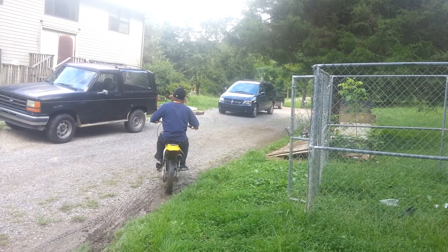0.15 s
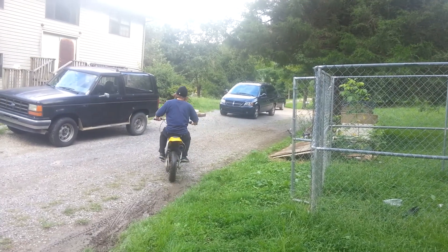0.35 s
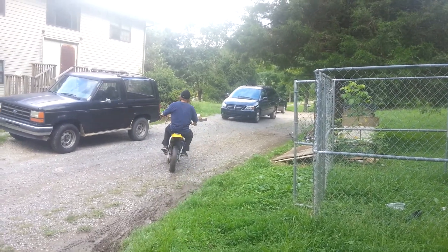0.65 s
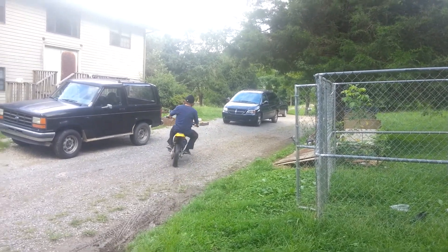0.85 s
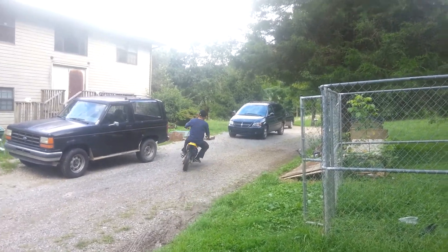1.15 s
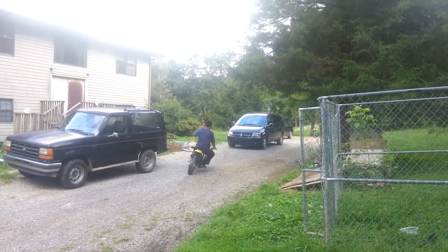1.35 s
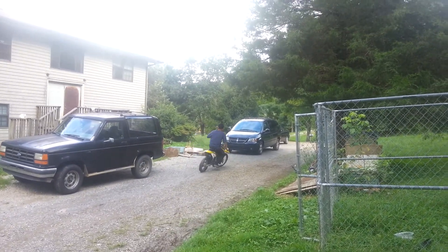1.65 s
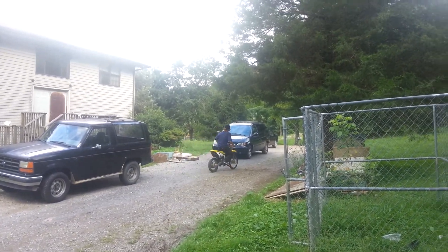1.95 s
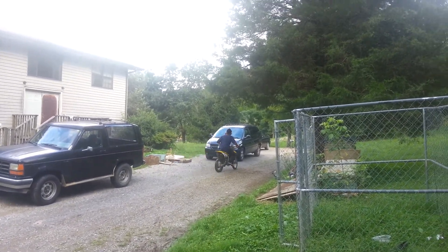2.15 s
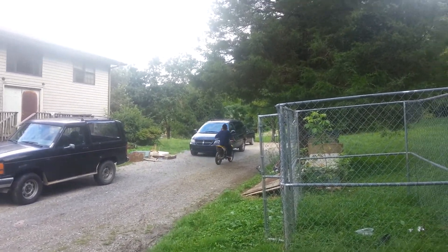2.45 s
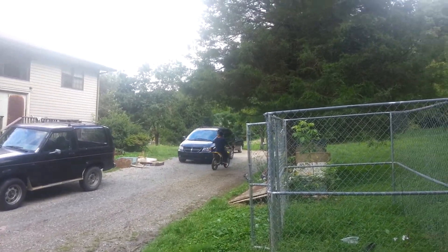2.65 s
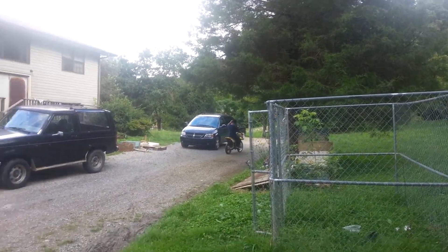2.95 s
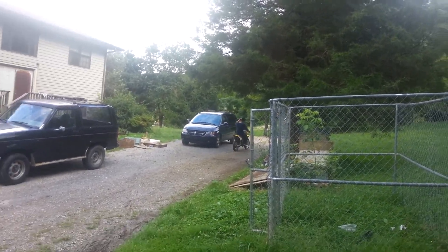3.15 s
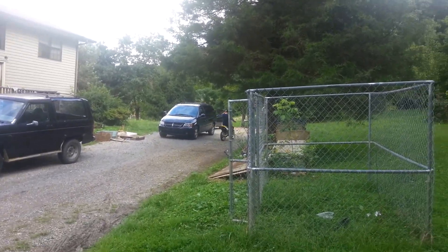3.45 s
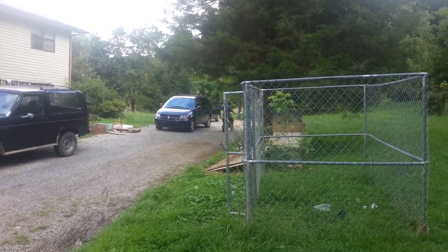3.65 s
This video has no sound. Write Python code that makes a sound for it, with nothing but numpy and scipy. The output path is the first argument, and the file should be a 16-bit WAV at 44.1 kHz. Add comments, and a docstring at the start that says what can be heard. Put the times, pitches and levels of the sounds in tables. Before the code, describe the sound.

A small dirt bike engine blares loudly up close, crackles, then putters away down a gravel drive.

```python
"""A small single-cylinder dirt bike pulls away down a gravel drive, cracks sharply and putters into the distance.
Each firing is a click shaped into bark, boom and blare, two decaying pipe tones and a puff of noise for the gas.
Short noise bursts make the cracks; valve gear and tyres are rattling, hissing noise.
House and trees echo the bike, insects shrill steadily, and the loudest peaks overload the microphone."""
import sys
import numpy as np
from scipy import signal
from scipy.fft import rfft, irfft
from scipy.io import wavfile

SR = 44100
rng = np.random.default_rng(int(sys.argv[2]) if len(sys.argv) > 2 else 0)


def wav_record(signal):
    """Record a signal, one row per channel, as 16-bit PCM in the file named by sys.argv[1]."""
    frames = np.transpose(np.atleast_2d(signal))
    bounded = np.clip(frames, -1, 1)
    # unit amplitude maps onto the largest positive 16-bit level
    quanta = np.round(bounded * 32767).astype(np.int16)
    wavfile.write(sys.argv[1], SR, quanta)


N = 167580

# How fast the engine fires: (time [s], firing rate [firings per second])
FIRING_RATE = [(0.23, 38.95), (0.29, 37.89), (0.34, 31.3), (0.45, 38.24), (0.56, 37.69), (0.66, 32.42),
               (0.76, 29.86), (1.05, 31.76), (1.3, 34.44), (1.49, 35.4), (1.55, 30.94), (1.63, 33.88),
               (1.92, 28.31), (2.2, 29.26), (2.55, 28.95), (2.75, 27.45), (3.15, 26.92), (3.35, 25.67),
               (3.8, 24.71)]


def undb(db):
    """Turn decibels into a gain."""
    return 10 ** (np.asarray(db) / 20)


def curve(table, t, axis=1):
    """Read one column of a table at time t, joining its points by straight lines."""
    rows = np.array(table)
    return np.interp(t, rows[:, 0], rows[:, axis])


def unit(x):
    """Scale a signal to an rms of 1."""
    return x / np.sqrt(np.mean(x ** 2))


def ring(x, response):
    """Let every sample of a signal set off the given response."""
    return signal.fftconvolve(x, response)[:N]


def colour(x, points, size=4096):
    """Give a signal the listed spectrum, with a filter of unit energy that never sounds early."""
    hz, db = np.array(points).T
    bin_hz = np.maximum(np.arange(size // 2 + 1) * SR / size, 1)
    gain = undb(np.interp(np.log(bin_hz), np.log(hz), db))
    # Folding the cepstrum forward in time gives the minimum-phase filter.
    cepstrum = irfft(np.log(gain))
    cepstrum[1:size // 2] *= 2
    cepstrum[size // 2 + 1:] = 0
    response = irfft(np.exp(rfft(cepstrum)))
    return ring(x, response / np.linalg.norm(response))


def pulses(times, sizes):
    """Place one single-sample click at each time."""
    return np.bincount((times * SR).astype(int), sizes, 2 * N)[:N]


def swell_and_decay(age, attack, decay):
    """Rise quickly and die away; attack and decay are in seconds."""
    return (1 - np.exp(-age / attack)) * np.exp(-age / decay)


def puffs(times, sizes, attack, decay):
    """Place one quick swell and decay at each time."""
    age = np.arange(SR // 10) / SR
    return ring(pulses(times, sizes), swell_and_decay(age, attack, decay))


def noise():
    """Make white noise of rms 1."""
    return rng.standard_normal(N)


def firings(t):
    """Time one firing for each full engine cycle, a little uneven."""
    first_s, unevenness_s = .231, .00008
    cycles = np.cumsum(curve(FIRING_RATE, t)) / SR
    cycles -= np.interp(first_s, t, cycles)
    times = np.interp(np.arange(int(cycles[-1]) + 1), cycles, t)
    return times + unevenness_s * rng.standard_normal(len(times))


def exhaust(times):
    """Each firing gives a bark, a boom, a blare, two pipe tones and a rasp of gas that rings the steel."""
    # Exhaust parts: (time [s], bark [dB], low boom [dB], lower pipe mode [dB],
    # upper pipe mode [dB], gas rasp before its lift [dB])
    exhaust_levels = [(.23, -12, -24.5, -21, -19.5, -21), (.31, -8, -22, -32, -18.5, -16),
                      (.345, -20, -15, -28, -38, -17.5), (.375, -19, -14.5, -26, -35, -15.5),
                      (.405, -22, -25, -31, -25, -31), (.45, -23, -20, -29, -16.5, -28),
                      (.485, -7.5, -22, -19, -21.5, -16.5), (.6, -10.5, -30, -20, -26.5, -18),
                      (.82, -7.5, -27, -17, -26, -15.5), (1.1, -10, -26, -20, -18.5, -22.5),
                      (1.28, -14.5, -50, -18, -12, -22.5), (1.5, -13.5, -28, -21, -21.5, -22.5),
                      (1.54, -26, -27, -35, -14.5, -30), (1.6, -22, -19, -24.5, -34, -28),
                      (1.7, -16.5, -15, -30.5, -24.5, -29), (1.82, -33.5, -27.5, -23.5, -40, -27.5),
                      (1.92, -17, -18, -29.5, -19.5, -32), (2.06, -20, -23.5, -24.5, -30.5, -33),
                      (2.2, -24, -28, -36, -27.5, -25.5), (2.35, -25, -24.5, -24.5, -30.5, -34),
                      (2.56, -30, -27, -28, -33.5, -39), (2.66, -28, -27.5, -26.5, -25, -33),
                      (2.8, -28, -33, -23.5, -27.5, -42), (2.95, -29, -40, -26.5, -31, -42.5),
                      (3.15, -45, -30, -23.5, -28, -40), (3.5, -31, -34, -30, -28.5, -46.5),
                      (3.8, -40, -34, -34.5, -34.5, -46)]
    # Upper blare of the open silencer, heard from right behind it: (time [s], level [dB])
    blare_levels = [(.23, -17.5), (.33, -11.5), (.41, -33.5), (.5, -13), (.65, -16), (.9, -20.5),
                    (1.3, -44), (1.9, -34), (2.5, -52), (3.8, -49)]
    # Relative spectra of the parts: (frequency [Hz], level [dB per Hz])
    bark_spectrum = [(30, -31), (60, -40), (95, -23.5), (145, -2.5), (245, 1), (360, -1), (435, -19),
                     (600, -14), (730, -11), (950, -30.5), (1400, -30), (3000, -44), (9000, -68.5)]
    boom_spectrum = [(40, -21.5), (60, -20.5), (82, -0.5), (105, -9), (132, 5), (180, -2), (300, -17.5),
                     (900, -52.5)]
    blare_spectrum = [(200, -27.5), (480, -22), (620, -19), (715, 4.5), (810, -1), (930, -17.5),
                      (1200, -18), (2500, -24), (8000, -44.5)]
    rasp_spectrum = [(300, 0), (750, 0.5), (1100, -29), (1330, 4), (1450, 8.5), (1650, 1), (2000, -3.5),
                     (2330, -8), (2680, -2.5), (3050, -5.5), (3800, -6), (5000, -10.5), (8000, -21),
                     (15000, -33)]
    # Pipe modes with hot gas, before tuning: (frequency [Hz], attack [s], decay [s])
    pipe_modes = [(373.4, 0.00067, 0.024), (528, .0012, 0.013)]
    scatter_db, gas_lift_db, shell_db = .8, 8, -3.5
    bark_lag_s, boom_lag_s, blare_lag_s = 0.00089, 0.00012, 0.00062

    force = undb(scatter_db * rng.standard_normal(len(times)))
    bark, boom, lower, upper, gas = (force * undb(curve(exhaust_levels, times, axis=column))
                                     for column in range(1, 6))
    blare = force * undb(curve(blare_levels, times))
    # Widely spaced firings get more energy, so each level holds at any firing rate.
    energy = np.sqrt(SR / curve(FIRING_RATE, times))
    body = colour(pulses(times + bark_lag_s, bark * energy), bark_spectrum)
    body += colour(pulses(times + boom_lag_s, boom * energy), boom_spectrum)
    body += colour(pulses(times + blare_lag_s, blare * energy), blare_spectrum)
    tones = sum(pipe(times, size * energy, *mode) for size, mode in zip((lower, upper), pipe_modes))
    jet = undb(gas_lift_db) * noise() * puffs(times, gas, attack=.0009, decay=.006)
    return body + tones + colour(jet, rasp_spectrum) + undb(shell_db) * shell(jet)


def pipe(times, sizes, hz, attack, decay):
    """Every firing rings one pipe mode at a slightly different pitch and strength."""
    # Pipe tuning, sinking overall as the gas cools and the bike recedes:
    # (time [s], pitch multiplier [ratio])
    tuning = [(.3, 1.053), (1.0, 0.95), (1.35, 1.033), (2.0, 0.97), (2.4, 0.94), (3.15, 0.9), (3.7, 0.89)]
    pitch_wobble, scatter_db = .005, 1.0  # wobble is a share of the pitch
    out, age = np.zeros(2 * N), np.arange(SR // 10) / SR
    swell = swell_and_decay(age, attack, decay)
    variations = rng.standard_normal((len(times), 2))
    for at, size, (detune, push) in zip(times, sizes, variations):
        pitch = hz * curve(tuning, at) * (1 + pitch_wobble * detune)
        tone = swell * np.sin(2 * np.pi * pitch * age)
        strength = size * undb(scatter_db * push)
        start = int(at * SR)
        out[start:start + len(age)] += strength * tone / np.linalg.norm(tone)
    return out[:N]


def shell(x):
    """The silencer's thin steel rings in narrow bands; a wider band dies away faster."""
    # Ringing bands of the steel: (frequency [Hz], width [Hz], relative level [dB])
    steel_bands = [(1480, 48, 4), (1640, 100, -7), (1955, 120, -7), (2150, 110, -2), (2500, 68, 3),
                   (2638, 58, 3), (3070, 76, -13), (3840, 82, -15), (5220, 1100, -20)]
    age = np.arange(SR // 20) / SR
    response = np.zeros(len(age))
    for hz, width, db in steel_bands:
        fade = np.sqrt(width) * np.exp(-np.pi * width * age)
        response += undb(db) * fade * np.sin(2 * np.pi * hz * age)
    return ring(x, response / np.linalg.norm(response))


def cracks():
    """Unburnt fuel cracks in the pipe as short noise bursts, each with its own mix of body and edge."""
    # Cracks, mostly off the throttle: (time [s], body [dB], bright edge [dB])
    crack_events = [(.742, -6, -15), (0.778, -5.5, -13), (1.57, -13, -13.5), (1.628, -1, -14),
                    (1.658, -8.5, -10.5), (1.689, -2, -11.5), (1.720, -8, -9.5), (1.751, -7.5, -11),
                    (1.785, -10, -11.5), (1.849, -8.5, -13), (1.883, -6, -11), (1.918, -14, -13.5),
                    (1.953, -9.5, -14), (1.99, -15, -11), (2.025, -11, -12.5), (2.057, -3.5, -5.5),
                    (2.094, -15, -15), (2.129, -17, -26), (2.196, -18, -23), (2.228, -16, -26),
                    (2.609, -6, -18), (2.646, -6.5, -15)]
    # Relative spectra of body and edge: (frequency [Hz], level [dB per Hz])
    body_spectrum = [(150, 0), (600, 3), (1100, -19), (1300, -1.5), (1500, 6), (1650, -0.5), (1850, -6),
                     (2130, -0.5), (2380, -21.5), (2660, -8.5), (3000, -23), (5000, -28), (14000, -29)]
    edge_spectrum = [(300, -15), (1100, -7), (2000, 2), (2400, -7.5), (2680, 9), (3000, -2), (3400, -3.5),
                     (3850, 5.5), (4200, -0.5), (4700, -6), (5400, -6.5), (7500, -6.5), (10000, -16.5),
                     (14000, -27)]
    times, body_db, edge_db = np.array(crack_events).T
    out = np.zeros(N)
    for db, spectrum in [(body_db, body_spectrum), (edge_db, edge_spectrum)]:
        bursts = noise() * puffs(times, undb(db), attack=.0003, decay=.0045)
        out += colour(bursts, spectrum)
    return out


def clatter(t, times):
    """Tyres hiss on the gravel; the valve gear rattles and rings the cooling fins after each firing."""
    # Relative spectra of the clatter and the fins: (frequency [Hz], level [dB per Hz])
    clatter_spectrum = [(150, 11.5), (700, 12), (1200, 1), (2500, -0.5), (4500, -2), (6000, -2),
                        (8000, -0.5), (10000, -9), (12000, -14), (14000, -12.5)]
    fin_spectrum = [(1200, -32), (1660, 3), (1950, -34), (2380, -15), (2580, 1), (2780, -17), (3150, -21),
                    (6000, -30)]
    # Valve gear and tyres together: (time [s], level [dB])
    clatter_levels = [(.23, -19), (.42, -21.5), (.58, -18.5), (.9, -22.5), (1.25, -19), (1.55, -23),
                      (1.8, -27), (2.1, -25.5), (2.5, -30), (3.0, -33.5), (3.8, -35.5)]
    # Gain on the ring of the cooling fins: (time [s], gain [dB])
    fin_levels = [(.23, -26), (.6, -24), (1.2, -32), (2.2, -40), (2.9, -29.5), (3.8, -46)]
    valve_lag_s, valve_scatter_db = .0075, 3.2
    sizes = undb(valve_scatter_db * rng.standard_normal(len(times)))
    valves = puffs(times + valve_lag_s, sizes, attack=.0015, decay=.007)
    grit = noise() * undb(1.65 * noise())  # uneven strength makes the hiss grainy
    rattle = unit(grit * (.5 + valves))  # steady hiss plus a burst after each firing
    hiss = colour(rattle, clatter_spectrum) * undb(curve(clatter_levels, t))
    fins = colour(noise() * valves, fin_spectrum) * undb(curve(fin_levels, t))
    return hiss + fins


def yard(bike):
    """House and trees scatter the bike's sound into a short tail, stronger as the ride goes on."""
    t60_s, start_db, end_db = .29, -13, -7.5  # t60: time for the tail to fall by 60 dB
    age = np.arange(SR // 2) / SR
    fade = undb(-60 * age / t60_s) * (1 - np.exp(-age / 0.021))
    tail = rng.standard_normal(len(age)) * fade
    return ring(bike, tail / np.linalg.norm(tail)) * undb(np.linspace(start_db, end_db, N))


def insects():
    """Insects shrill steadily, made from noise in a high band."""
    # Relative spectrum of the insects: (frequency [Hz], level [dB per Hz])
    insect_spectrum = [(4000, -45), (5900, -35), (6600, 14), (7150, 16), (7900, -3), (9500, -59),
                       (14000, -22)]
    return undb(-42) * colour(noise(), insect_spectrum)


def scene():
    """Add up bike, echoes and insects, the same in both channels."""
    t = np.arange(N) / SR
    times = firings(t)
    bike = exhaust(times) + cracks() + clatter(t, times)
    return np.tile(bike + yard(bike) + insects(), (2, 1))


def record(dry):
    """The microphone opens after a moment, drops deep bass, flattens the loudest peaks and cuts the top."""
    opens_s, fade_s, low_cut_hz, top_hz = .229, .002, 75, 14600
    opened = np.clip((np.arange(N) / SR - opens_s) / fade_s, 0, 1)
    thin = signal.sosfilt(signal.butter(4, low_cut_hz, "high", fs=SR, output="sos"), dry)
    flat = thin / (1 + thin ** 16) ** (1 / 16)  # nearly untouched until close to full scale
    top_cut = signal.ellip(10, .2, 70, top_hz, fs=SR, output="sos")
    return signal.sosfilt(top_cut, flat * opened)


dry = scene()
out = record(dry)
wav_record(out)
```